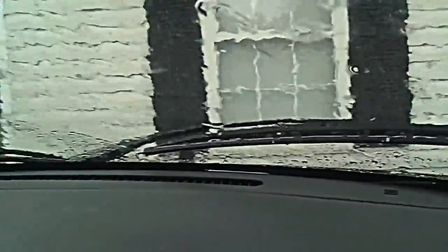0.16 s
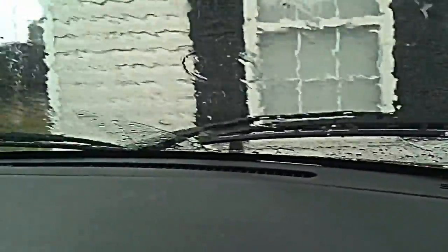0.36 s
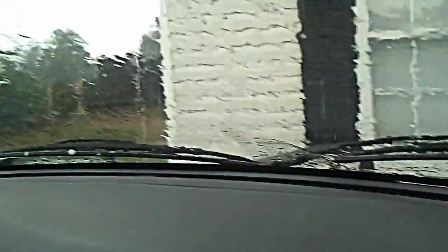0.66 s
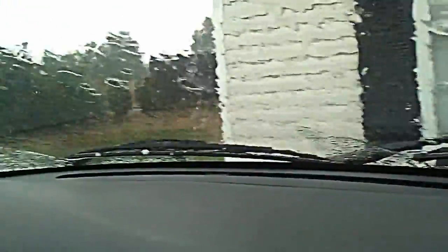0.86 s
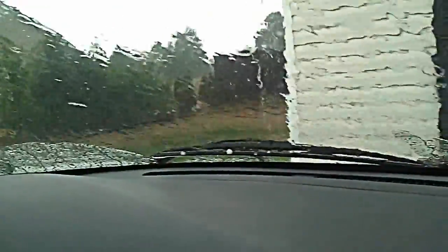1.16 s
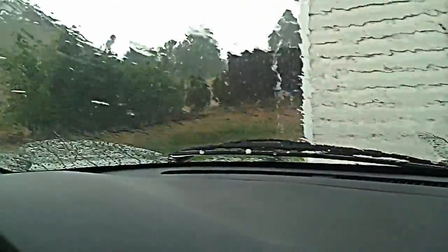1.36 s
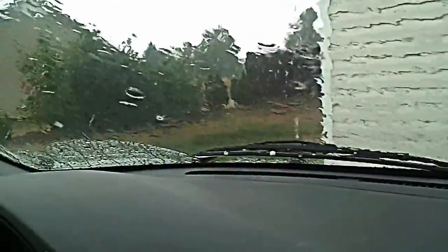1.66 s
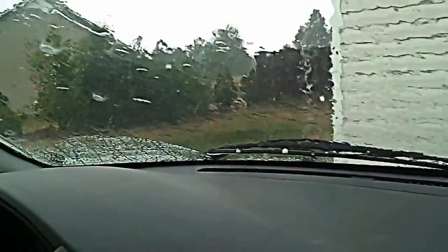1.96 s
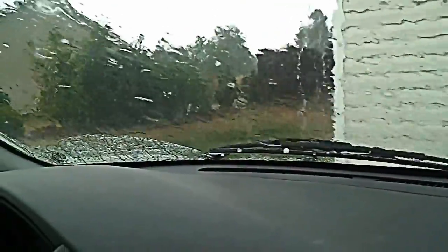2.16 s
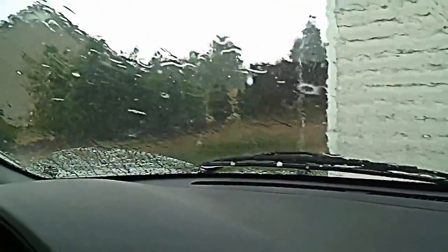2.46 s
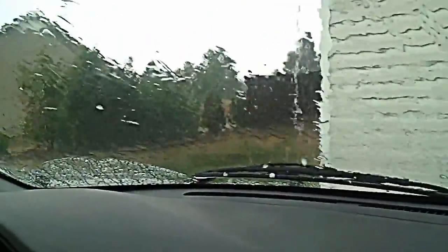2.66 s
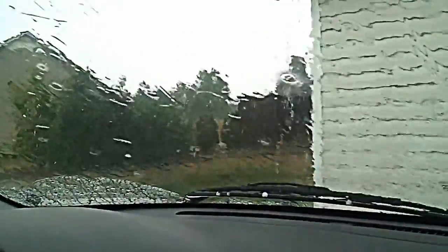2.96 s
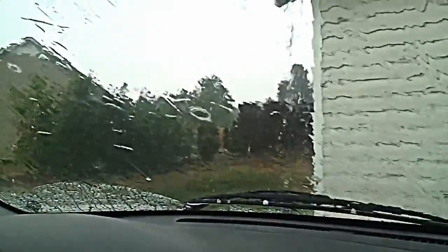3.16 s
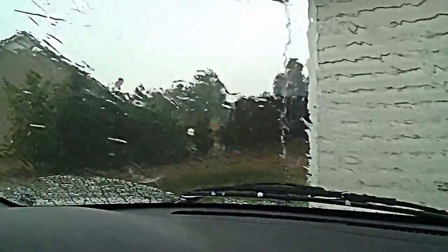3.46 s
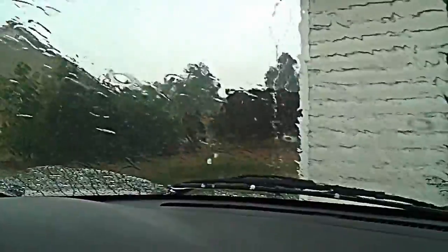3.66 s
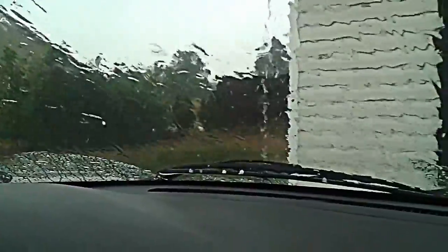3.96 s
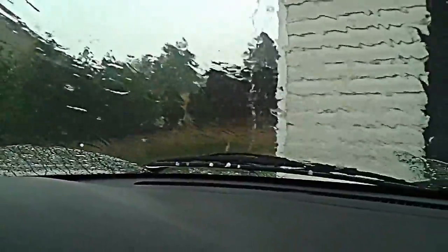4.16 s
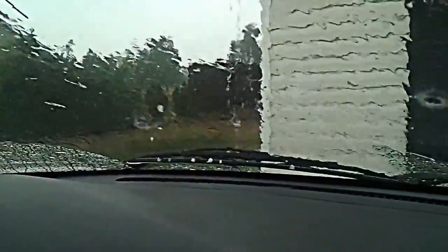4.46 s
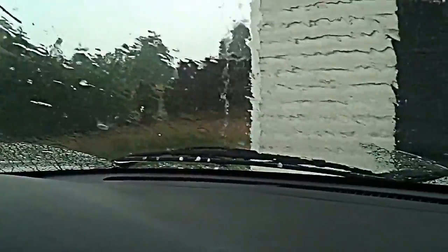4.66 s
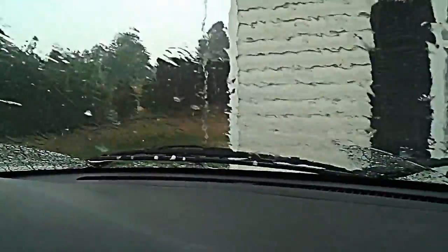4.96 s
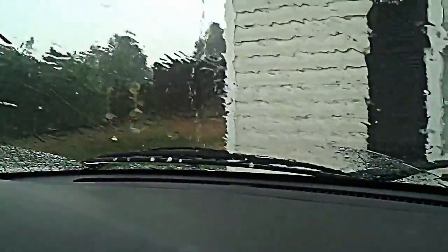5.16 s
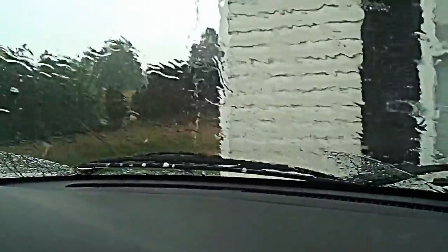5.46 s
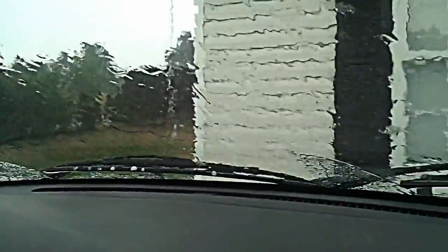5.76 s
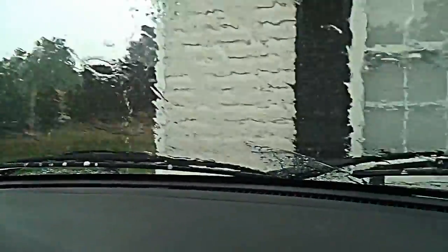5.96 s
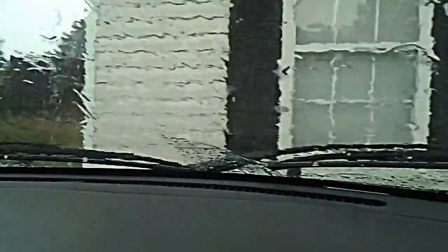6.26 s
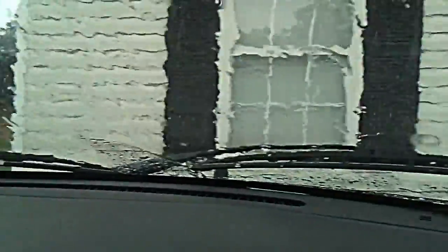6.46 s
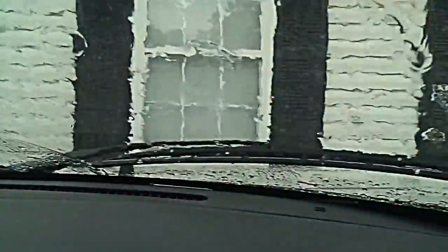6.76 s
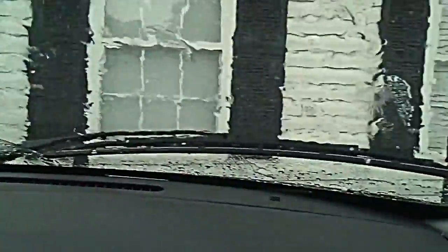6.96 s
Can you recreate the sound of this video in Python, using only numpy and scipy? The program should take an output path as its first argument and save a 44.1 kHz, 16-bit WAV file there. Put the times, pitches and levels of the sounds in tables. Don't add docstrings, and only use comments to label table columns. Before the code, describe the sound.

Inside a parked car, heavy rain drums densely on roof and windshield while hailstones bang, knock and crack sharply at irregular moments.

```python
import sys
import numpy as np
from scipy import signal
from scipy.io import wavfile

SR = 44100
rng = np.random.default_rng(int(sys.argv[2]) if len(sys.argv) > 2 else 0)


def level_to_linear(level):
    exponent = np.asarray(level, float) / 20
    return 10 ** exponent


def dump_mix(stems):
    frames = np.atleast_2d(stems).T
    limited = np.clip(frames, -1, 1)
    pcm = np.round(limited * 32767).astype(np.int16)
    wavfile.write(sys.argv[1], SR, pcm)


N = 313110


def at_hz(points, hz):
    table_hz, values = np.array(points).T
    return np.interp(np.log(hz), np.log(table_hz), values)


def drift(rate_hz):
    hop = 40
    r = np.exp(-2 * hop * np.pi * rate_hz / SR)
    noise = rng.standard_normal(N // hop + 2002)
    slow = signal.lfilter([1], [1, -2 * r, r * r], noise)[2000:]
    return np.interp(np.arange(N) / hop, np.arange(len(slow)), slow / slow.std())


def drops(per_s, spread_db, t60_s):
    sizes = level_to_linear(2 * spread_db * np.minimum(rng.exponential(1, N), 4))
    landings = sizes * (rng.random(N) < per_s / SR)
    power = signal.lfilter([1], [1, -level_to_linear(-120 / (t60_s * SR))], landings + 1e-18)
    return power / power.mean()


def hail():
    # (time [s], strike [dB], thud [dB re strike], crack [dB re strike], ring t60 [s])
    large_hard = [(1.5523, -13, -3.5, -8, 0.076), (1.6474, -21.5, -4, -1.5, 0.05),
                  (1.697, -10.5, -0.5, -14.5, 0.087), (1.944, -19, 0, -10, 0.11),
                  (1.9886, -10, -2, 1, 0.047), (2.462, -20.5, 5, 2.5, 0.041), (2.608, -19.5, -9, -5, 0.08),
                  (2.7928, -9.5, -4.5, -7, 0.04), (2.9445, -11, -6, -9, 0.027), (3.145, -16, 0, -2, 0.097),
                  (3.6465, -16, 5.5, -2, 0.088), (3.8477, -21.5, 2, -7.5, 0.14),
                  (4.533, -9.5, -1.5, -2, 0.058), (4.5558, -19, 5, -0.5, 0.14),
                  (4.98, -16.5, -14, -1.5, 0.085), (5.231, -16.5, -12, -7.5, 0.12),
                  (5.4964, -14.5, -6, 1, 0.052), (5.7251, -12.5, -1, -8.5, 0.13),
                  (6.1957, -13, -4, -2, 0.046), (6.288, -15.5, 1, -12, 0.1)]
    large_slushy = [(0.088, -19, -0.5, -10, 0.066), (0.405, -14, -11, -23, 0.066),
                    (0.541, -14, 0, -5.5, 0.082), (0.942, -26.5, 11, 1.5, 0.06),
                    (1.1195, -21, 0, -6, 0.075), (1.541, -21.5, 4.5, -6, 0.052),
                    (1.667, -16, -3.5, -6, 0.11), (1.8406, -26, -7, 0.5, 0.069),
                    (1.8983, -25.5, 9, -9, 0.13), (2.9121, -17, 2, -4, 0.1), (5.2015, -13, 1, -6, 0.1),
                    (5.343, -17, 6, -2, 0.11), (5.802, -22, -14, -1, 0.079), (0.1558, -15, 1.5, -1, 0.063),
                    (2.64, -21.5, 2.5, -0.5, 0.094), (3.5863, -19, 1.5, -3, 0.064),
                    (5.302, -18.5, 2, -1, 0.098), (6.7454, -4.5, -3.5, -7.5, 0.092)]
    # (time [s], strike [dB], thud [dB re strike], ring t60 [s])
    on_roof = [(0.018, -37, -3, 0.12), (0.041, -28.5, 10.5, 0.079), (0.1975, -27.5, 11, 0.072),
               (0.449, -30.5, 9, 0.086), (0.521, -28, 11, 0.25), (0.7450, -27, 12, 0.086),
               (1.0197, -30, 12.5, 0.047), (1.3149, -31, 5, 0.07), (1.4078, -29.5, 5.5, 0.053),
               (1.715, -27, 13, 0.13), (2.1194, -21.5, 3.5, 0.11), (2.5336, -28, 5.5, 0.068),
               (3.132, -30.5, 6.5, 0.16), (3.4397, -32, 10.5, 0.16), (3.4914, -26.5, 9, 0.11),
               (3.509, -39, 22, 0.029), (3.7055, -35.5, 15, 0.082), (3.861, -26, 12.5, 0.059),
               (4.4748, -38.5, 15, 0.066), (4.6556, -30.5, 16, 0.028), (4.7657, -28, 13.5, 0.031),
               (4.8532, -35, -1, 0.03), (5.1393, -33.5, 8.5, 0.14), (5.27, -29.5, 10.5, 0.15),
               (5.713, -34.5, 11, 0.22), (5.768, -31, 12, 0.19), (6.0183, -30.5, 10, 0.16),
               (6.7978, -25.5, 5, 0.11), (6.925, -35, 3, 0.084), (7.007, -31, -6, 0.19)]
    on_glass = [(0.0, -22, -10, 0.13), (0.2883, -24.5, 4, 0.037), (0.3637, -32, -4, 0.054),
                (1.0046, -23, -8, 0.042), (1.1576, -30.5, 5, 0.15), (1.4412, -30.5, 6, 0.099),
                (1.6381, -24.5, -11, 0.18), (2.0334, -21, 5, 0.041), (2.0573, -25, -22, 0.11),
                (2.0917, -35.5, 5.5, 0.17), (2.3338, -47, -5, 0.19), (2.356, -29, 4, 0.17),
                (2.755, -27, -7, 0.03), (2.7817, -20, -1, 0.061), (2.8552, -36, -2, 0.05),
                (3.3589, -25, -3, 0.13), (4.0685, -20, -2.5, 0.066), (4.1146, -24.5, -19, 0.056),
                (4.2588, -23, -1, 0.12), (4.5122, -29, 0, 0.098), (4.6714, -25.5, -10, 0.1),
                (5.0186, -32, -11, 0.084), (5.043, -22.5, -5.5, 0.15), (5.4112, -30.5, 4, 0.2),
                (5.8924, -28, 1, 0.17), (5.9433, -25, 5, 0.064), (6.0792, -31, -3, 0.17),
                (6.0967, -26.5, 0.5, 0.16), (6.3346, -30.5, 3.5, 0.23), (6.3688, -26.5, 1, 0.086)]
    wet_pellets = [(0.223, -31, 10.5, 0.097), (0.425, -30.5, 4.5, 0.19), (1.7884, -27, 3, 0.048),
                   (2.3152, -33, 8, 0.19), (2.418, -28.5, 7, 0.03), (2.4988, -25, 2, 0.08),
                   (2.88, -36, 14, 0.031), (2.9782, -38, 11, 0.22), (3.287, -29, 6, 0.17),
                   (3.9535, -29.5, 6.5, 0.27), (4.1391, -29, 10.5, 0.041), (4.1735, -32, 7.5, 0.092),
                   (5.8642, -28.5, 6.5, 0.087), (6.2288, -27.5, 1.5, 0.37), (6.4523, -26, -1, 0.13),
                   (6.4866, -30, 6.5, 0.13), (6.58, -27, 4.5, 0.12), (6.6624, -30, 8, 0.23),
                   (6.713, -25.5, 1, 0.07)]
    roof_crack_db, glass_crack_db, wet_crack_db = -8, -8, -8
    rows = [row + (True,) for row in large_slushy] + [row + (False,) for row in large_hard]
    small = (
        (wet_pellets, wet_crack_db, True),
        (on_roof, roof_crack_db, False),
        (on_glass, glass_crack_db, False),
    )
    for table, crack_db, slushy in small:
        rows += [(s, db, thud_db, crack_db, t60_s, slushy) for s, db, thud_db, t60_s in table]
    return rows


def stones(hz, luck):
    # (frequency [Hz], level [dB per band])
    strike_colour = [(25, -33), (60, -37.5), (110, -10), (200, -10.5), (450, 0), (1000, -0.2), (2000, 1),
                     (4000, 4.5), (6000, 4.5), (8000, 6)]
    # (frequency [Hz], share of ring time [ratio])
    ring_share = [(100, 0.35), (400, 1.58), (1000, 1.34), (3000, 0.91), (8000, 0.65)]
    boom_db, knock_db = -1.5, 0.5
    slush_build_s, slush_start = 0.0042, 0.21
    cabin_tail_db, cabin_tail_s = -29, 0.44
    step = 8
    power, rate_hz = np.zeros(N // step + 1), SR / step
    ring, colour_db = at_hz(ring_share, hz), at_hz(strike_colour, hz)
    luck_db = 0.01 + 2.0 * (hz < 1300)
    for k, (s, db, thud_db, crack_db, t60_s, slushy) in enumerate(hail()):
        blend_db = [thud_db + boom_db, thud_db + knock_db, 0, crack_db]
        level_db = db + np.interp(np.log(hz), np.log([300, 900, 2300, 5700]), blend_db)
        level_db = level_db + colour_db - 9.0 + luck_db * luck[k]
        ring_s, tail_s = np.clip(t60_s, .03, .2) * ring, cabin_tail_s * ring
        start = max(round((s - .0006) * rate_hz), 0)
        t = np.arange(min(int(.4 * tail_s * rate_hz), len(power) - start)) / rate_hz
        rise = 1 - np.exp(-t / (0.00051 + 0.41 / hz))
        if slushy:
            rise = rise * (1 - (1 - slush_start) * np.exp(-t / slush_build_s))
            t = np.maximum(t - 0.9 * slush_build_s, 0)
        fall = level_to_linear(-120 * (t / ring_s) ** 1.24) + level_to_linear(2 * cabin_tail_db - 120 * t / tail_s)
        power[start:][:len(t)] += level_to_linear(2 * level_db) * rise ** 2 * fall
    return np.repeat(power, step)[:N]


def panels():
    # (time [s], drumming [dB])
    drumming = [(0.0, -6.5), (0.08, -19.5), (0.28, -21.5), (0.79, -23.5), (1.01, -19.5), (1.4, -24),
                (2.02, -20), (2.39, -27.5), (2.49, -21), (3.0, -21), (3.12, -21), (3.46, -23),
                (4.55, -22.5), (4.88, -20), (5.34, -23.5), (5.48, -23), (6.21, -21), (7.1, -21.5)]
    # (frequency [Hz], level [dB per Hz])
    patter = [(24, -55.5), (40, -22), (70, -21.5), (158, -7.5), (263, -5), (448, -4), (911, -6.5),
              (1090, -9.5), (1300, -9), (1850, -14), (2640, -18.5), (3760, -22.5), (8000, -32.5),
              (10400, -61), (17600, -120)]
    steady_rain_db, hiss_trim_db, hiss_holds = -23, -0.4, 1.2
    shatter_db, shatter_per_s = 1, 90
    gust_db, flutter_db = 1.3, 1.1
    run_in = 600
    rain_db = np.interp(np.arange(N) / SR, *np.transpose(drumming))
    hiss_db = hiss_trim_db - hiss_holds * (rain_db - steady_rain_db)
    edges_hz = 25 * 2 ** np.arange(0, 8.6, 1 / 3)
    white = rng.standard_normal((2, N))
    luck = rng.standard_normal((len(hail()), len(edges_hz)))
    heavy, fine = drops(220, 1.7, 0.12), drops(270, 5.4, 0.027)
    gusts = drift(5.4)
    shatter = level_to_linear(2 * shatter_db * drift(shatter_per_s))
    out = np.zeros(N)
    for k, (low, high) in enumerate(zip(edges_hz, edges_hz[1:])):
        hz = np.sqrt(low * high)
        bright = np.clip(np.log2(hz / 500) / 7.2, 0, 1)
        grain = 0.31 + 0.14 * heavy + 0.39 * bright * fine
        level_db = rain_db + bright * hiss_db + at_hz(patter, hz) - 30
        level_db = level_db + gust_db * gusts + flutter_db * drift(8.7)
        rain = level_to_linear(2 * level_db) * grain * (high - low)
        power = rain + shatter ** bright * stones(hz, luck[:, k])
        drive = white[k % 2] * np.sqrt(power * SR / 2 / (high - low))
        drive = np.r_[drive[run_in:0:-1], drive]
        band = signal.butter(2, [low, high], "band", fs=SR, output="sos")
        out += signal.sosfilt(band, drive)[run_in:]
    return out


def cracks(count=14):
    # (time [s], peak [dB], lowest mode [Hz], highest mode [Hz], t60 [s])
    hard_cracks = [(0.2884, -9, 700, 7500, 0.005), (1.9884, -5, 506, 2030, 0.014),
                   (1.9904, 1.5, 4200, 7400, 0.008), (2.4614, -5, 3130, 5500, 0.02),
                   (2.6094, 1.5, 2000, 5900, 0.005), (2.9321, -5, 3300, 7600, 0.0061),
                   (2.941, -2.5, 550, 2300, 0.0089), (4.534, 4, 3000, 5600, 0.016),
                   (4.9797, -6.5, 2780, 5530, 0.059), (5.4968, 1, 1600, 6800, 0.014),
                   (6.1964, -2.5, 1470, 4200, 0.02), (6.798, -13, 4000, 5230, 0.0074),
                   (2.9424, 3, 1500, 7400, 0.005), (0.7442, -15, 350, 1800, 0.025),
                   (0.9432, -17, 400, 2200, 0.025), (2.7815, -12, 900, 7000, 0.04),
                   (1.6715, -14, 500, 2500, 0.03), (0.0, -9, 800, 4000, 0.03),
                   (4.5615, -14, 1500, 7400, 0.02), (5.2035, -8, 500, 5000, 0.02)]
    # (time [s], peak [dB], pitch [Hz])
    thumps = [(0.101, -16, 815), (0.277, -13.5, 567), (0.362, -19.5, 744), (0.812, -19, 640),
              (0.872, -20.5, 466), (1.07, -18, 545), (1.174, -15, 484), (1.212, -19.5, 443),
              (1.277, -20.5, 490), (1.307, -17, 331), (1.463, -19.5, 392), (1.84, -18, 370),
              (2.175, -17.5, 392), (2.35, -18, 1076), (2.597, -14, 724), (2.833, -16, 482),
              (3.012, -17, 396), (3.057, -17.5, 420), (3.1, -22, 381), (3.397, -18, 790),
              (3.457, -14.5, 450), (3.92, -18, 584), (3.953, -15.5, 583), (4.222, -20, 714),
              (4.329, -17, 620), (4.371, -16.5, 980), (4.883, -17, 424), (4.937, -16, 442),
              (5.107, -19, 453), (5.651, -22, 706), (5.943, -18.5, 529), (6.366, -14.5, 438),
              (6.483, -14.5, 413), (6.854, -14.5, 689), (7.009, -18, 592)]
    thump_t60_s, thump_trim_db, thump_spread = 0.073, -5, 1.3
    crack_rise_s, scatter_db = 0.0003, 4
    rows = hard_cracks + [
        (s, db + thump_trim_db, hz / thump_spread, hz * thump_spread, thump_t60_s)
        for s, db, hz in thumps
    ]
    out = np.zeros(N + SR)
    luck = rng.random((len(rows), 3, count))
    for (s, db, low, high, t60_s), (place, phase, size) in zip(rows, luck):
        t = np.arange(int(t60_s * SR))[:, None] / SR
        modes_hz = low * (high / low) ** ((np.arange(count) + place) / count)
        rise = 1 - np.exp(-t / (crack_rise_s + 0.031 * t60_s))
        envelope = rise * level_to_linear(2 * scatter_db * size - 60 * t / t60_s)
        crack = (envelope * np.sin(2 * np.pi * (modes_hz * t + phase))).sum(1)
        out[round(s * SR):][:len(t)] += level_to_linear(db) * crack / np.abs(crack).max()
    return out[:N]


def sleet(count=300):
    base_db, spread_db, centre_hz = -33.5, 3.5, 3000
    when, size, pitch = rng.random((count, 3)).T
    peak_db = base_db - spread_db * np.log(size + .1)
    return list(zip(when * (N - 2) / SR, peak_db, centre_hz * 2 ** (1.2 * pitch - 0.6)))


def contacts():
    # (time [s], peak [dB], pitch [Hz])
    ticks = [(0.1972, -12, 4170), (1.0059, -11, 4600), (1.1587, -21, 3720), (1.3458, -17.5, 4540),
             (1.6386, -13.5, 4790), (1.9481, -13, 3380), (2.0336, -10, 4560), (2.1212, -15, 4060),
             (2.3343, -15, 4400), (2.3565, -8, 4750), (2.7562, -17, 4560), (2.7949, -16, 3960),
             (2.8557, -16.5, 4700), (3.0041, -19, 4390), (3.5095, -13, 3970), (5.4117, -15, 4050),
             (5.6012, -17.5, 4600), (5.9444, -14.5, 3420), (6.2899, -28, 3570), (6.5944, -18, 3110)]
    # (time [s], peak [dB], pitch [Hz])
    knocks = [(0.042, -3, 608), (0.157, -1, 820), (0.198, -3, 634), (0.407, -14, 710), (0.745, -10, 406),
              (0.946, -12, 431), (1.549, -9, 1040), (1.672, -4, 640), (1.698, 0, 725), (1.9, -10, 453),
              (1.949, -6.5, 491), (2.499, -8.5, 370), (2.912, -9, 462), (3.147, -2, 795),
              (3.588, -4.5, 490), (3.648, -4, 448), (3.863, -6, 375), (4.537, -6, 510), (5.204, -3, 450),
              (5.345, -3.5, 767), (5.727, -9, 1190), (6.288, -8, 610), (6.667, -14, 635), (6.717, -7, 496),
              (6.747, 11, 658)]
    # (time [s], peak [dB])
    grains = [(0.3176, -24), (0.6677, -33), (0.688, -24), (0.9016, -30), (1.1095, -39), (1.233, -21),
              (1.315, -24), (1.3697, -25), (1.823, -35), (1.937, -31), (2.217, -18), (2.2977, -19),
              (2.8345, -28), (3.0437, -25), (3.1123, -24), (3.5713, -32), (3.706, -31), (3.7991, -27),
              (4.1969, -18), (4.7418, -17.5), (4.765, -28), (4.8036, -31), (4.8533, -15), (5.168, -25),
              (5.453, -30), (5.6205, -25), (5.703, -25), (5.988, -23), (6.5686, -28), (7.0075, -21)]
    grain_hz, knock_trim_db = 3750, -6
    t60_s, t60_ref_hz = 0.0062, 4500
    rows = ticks + [(s, db, grain_hz) for s, db in grains]
    rows = rows + [(s, db + knock_trim_db, hz) for s, db, hz in knocks] + sleet()
    out, luck = np.zeros(N), rng.standard_normal((len(rows), 2, 8))
    for (s, db, hz), (pitch, strength) in zip(rows, luck):
        start = round(s * SR)
        t = np.arange(int(t60_s * t60_ref_hz / hz * SR))[:, None] / SR
        octaves = 0.51 * np.linspace(-1, 1, 8) + .1 * pitch
        modes_hz = np.clip(hz * 2 ** octaves, 250, 7800)
        fall = level_to_linear(4.1 * strength - 60 * t / t60_s * hz / t60_ref_hz)
        click = (fall * np.sin(2 * np.pi * modes_hz * t)).sum(1)[:N - start]
        out[start:][:len(t)] += level_to_linear(db + 2.5) * click / (np.abs(click).max() + 1e-9)
    return signal.sosfilt(signal.butter(2, 220, "high", fs=SR, output="sos"), out)


def splashes():
    # (time [s], peak [dB])
    bursts = [(0.22, -22.5), (0.362, -28.5), (0.592, -31), (0.613, -29), (0.804, -29), (0.853, -30),
              (0.9, -29), (1.368, -29), (2.175, -25), (2.401, -29), (2.977, -26), (3.058, -28), (3.09, -32),
              (3.258, -29.5), (3.555, -31), (3.694, -31), (3.797, -29), (3.995, -27), (4.017, -26.5),
              (4.051, -27), (4.152, -26.5), (4.309, -27), (4.421, -29), (4.475, -29), (4.896, -25.5),
              (4.946, -26), (5.165, -32), (5.45, -28), (5.681, -31.5), (5.928, -26), (6.143, -30),
              (6.439, -25), (6.525, -26.5), (6.867, -28.5), (6.934, -29)]
    t60_s, trim_db, low_hz, high_hz = 0.09, -1, 1500, 4500
    spray_per_s, spray_db, spray_spread_db = 500, -39, 4.5
    starts = np.full(N, 1e-18)
    for s, db in bursts:
        starts[round(s * SR)] = level_to_linear(db + trim_db)
    dying = signal.lfilter([1], [1, -level_to_linear(-60 / (t60_s * SR))], starts)
    hiss = signal.lfilter([.01], [1, -.99], dying) * rng.standard_normal(N)
    sizes_db = spray_db + 12 + spray_spread_db * np.minimum(rng.exponential(1, N), 3.5)
    sizes = level_to_linear(sizes_db) * rng.choice([-1, 1], N)
    spray = sizes * (rng.random(N) < spray_per_s / SR)
    dulling = signal.butter(1, [low_hz, high_hz], "band", fs=SR, output="sos")
    return signal.sosfilt(dulling, hiss + spray)


def jolts():
    # (time [s], peak [dB])
    pushes = [(0.138, -38), (0.52, -37), (2.89, -50), (2.894, -34), (3.118, -38), (3.628, -27),
              (3.831, -45), (4.542, -43.5), (4.955, -47), (5.192, -38), (5.323, -34), (5.706, -35),
              (6.264, -46), (6.726, -43.5)]
    push_hz, decay_s, delay_s = 45, 0.007, .02
    clicks = np.zeros(N)
    for s, db in pushes:
        clicks[round((s + delay_s) * SR)] = level_to_linear(db + 5)
    t = np.arange(int(.06 * SR)) / SR
    return signal.fftconvolve(clicks, np.sin(2 * np.pi * push_hz * t) * np.exp(-t / decay_s))[:N]


def cabin(x):
    # (frequency [Hz], width [Hz], level [dB])
    resonances = [(166.4, 52, 3.5), (390, 65, -4), (448, 95, -4.5), (642, 112, -6), (740, 31, -2.5),
                  (1030, 43, -3.5), (1140, 51, -1), (1860, 266, -3.5), (3570, 570, -6.5),
                  (7040, 730, -11.5)]
    out = x.copy()
    for hz, width_hz, db in resonances:
        r = np.exp(-np.pi * width_hz / SR)
        zeros = [(1 - r * r) / 2, 0, (r * r - 1) / 2]
        poles = [1, -2 * r * np.cos(2 * np.pi * hz / SR), r * r]
        out += level_to_linear(db) * signal.lfilter(zeros, poles, x)
    return out


def scene():
    return cabin(panels() + contacts() + cracks() + splashes() + jolts())[None]


def top_cut(x):
    return signal.sosfilt(signal.butter(12, 16400, fs=SR, output="sos"), x)


def record(dry):
    cutoff_hz = 7975
    cut = signal.ellip(12, .5, 90, cutoff_hz, fs=SR, output="sos")
    settled = signal.sosfilt_zi(cut)[:, None] * dry[:, :1]
    narrow, _ = signal.sosfilt(cut, np.clip(dry, -.85, .85), zi=settled)
    return top_cut(np.clip(narrow, -1, 1))


dry = scene()
out = record(dry)
dump_mix(out)
```